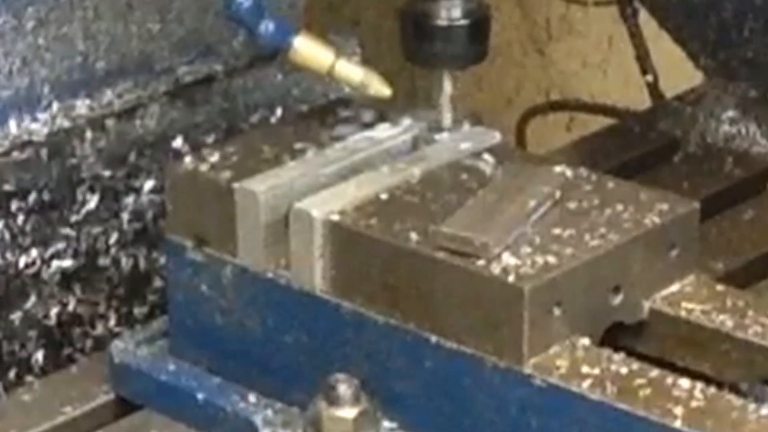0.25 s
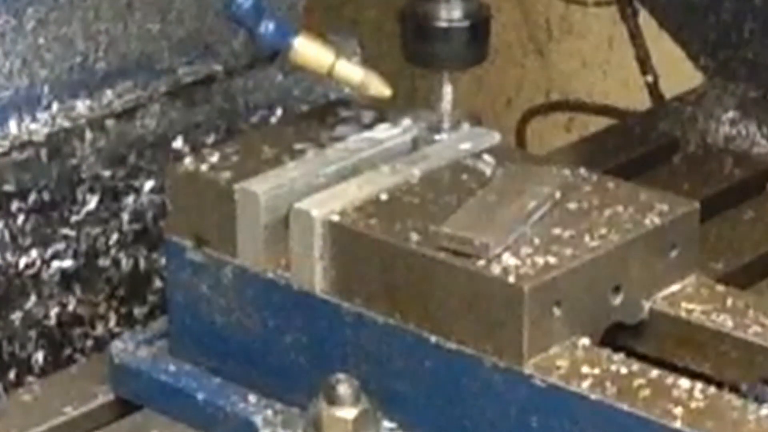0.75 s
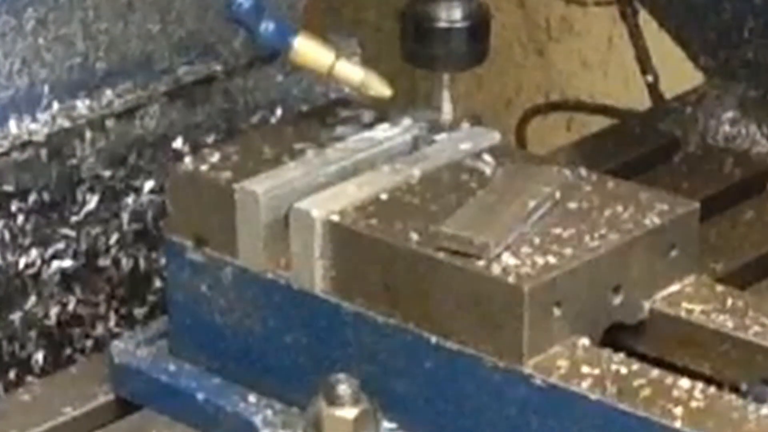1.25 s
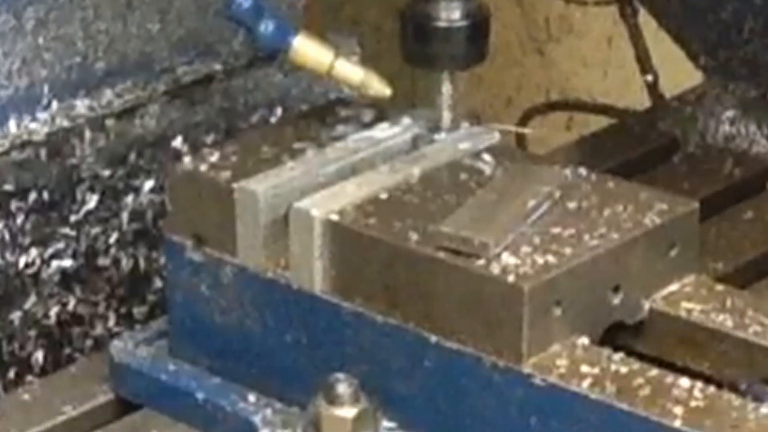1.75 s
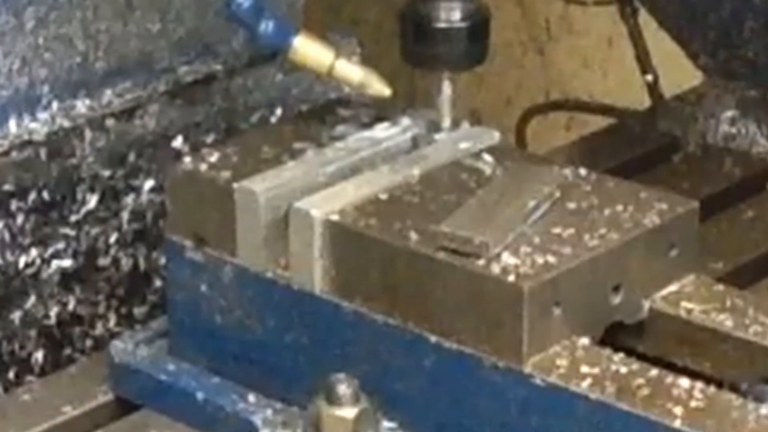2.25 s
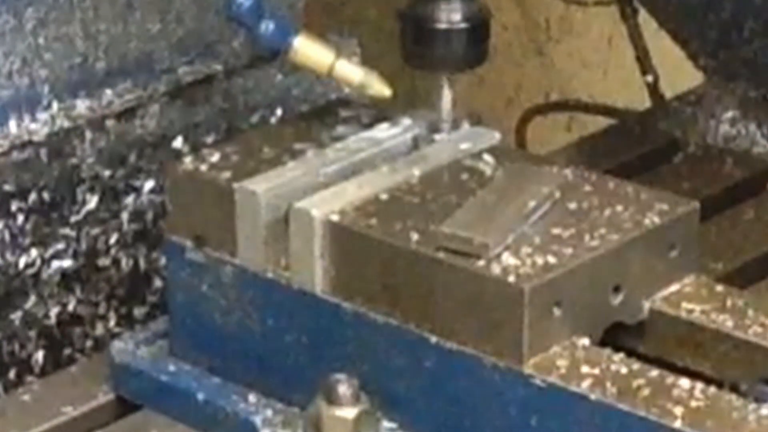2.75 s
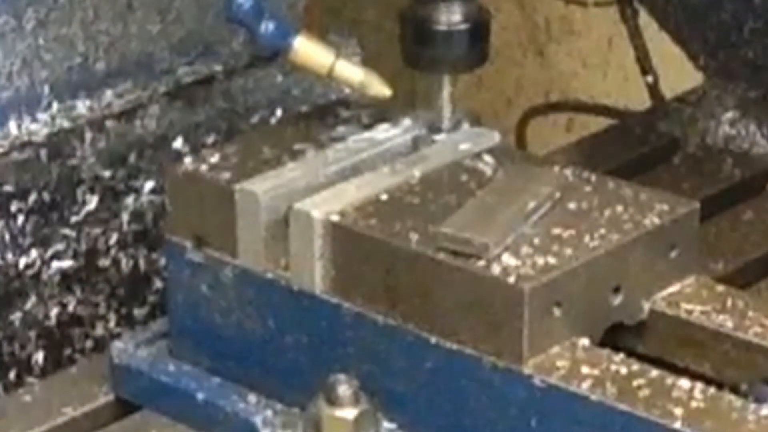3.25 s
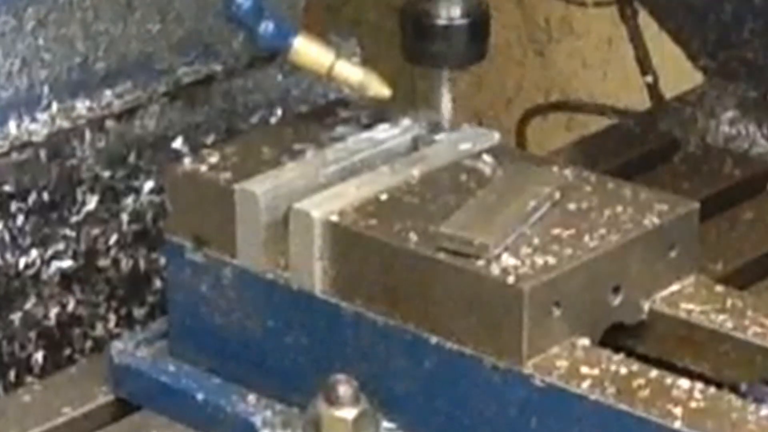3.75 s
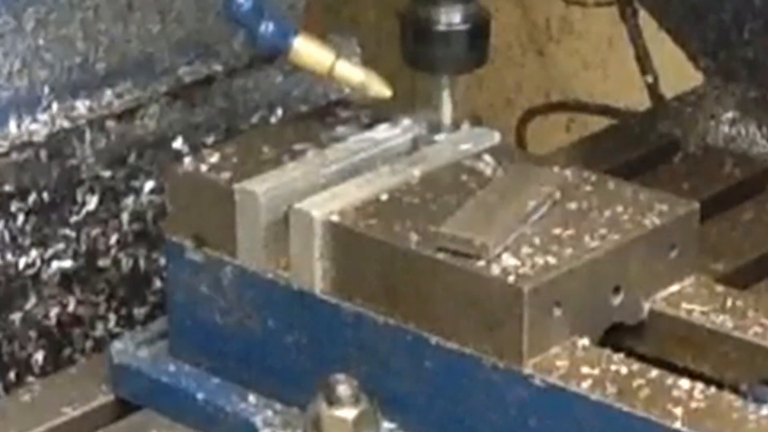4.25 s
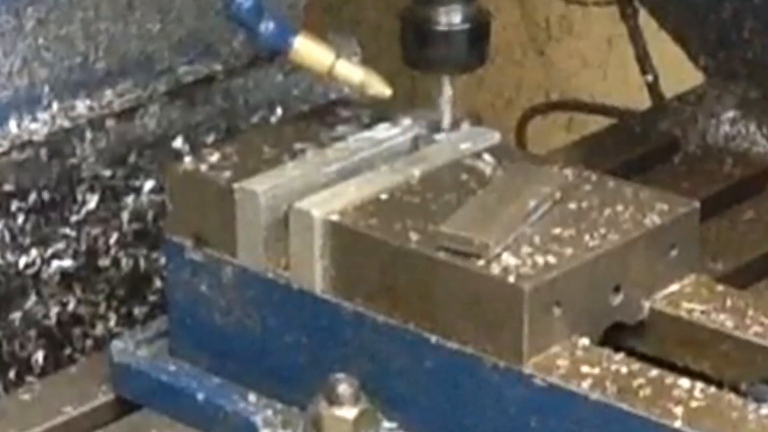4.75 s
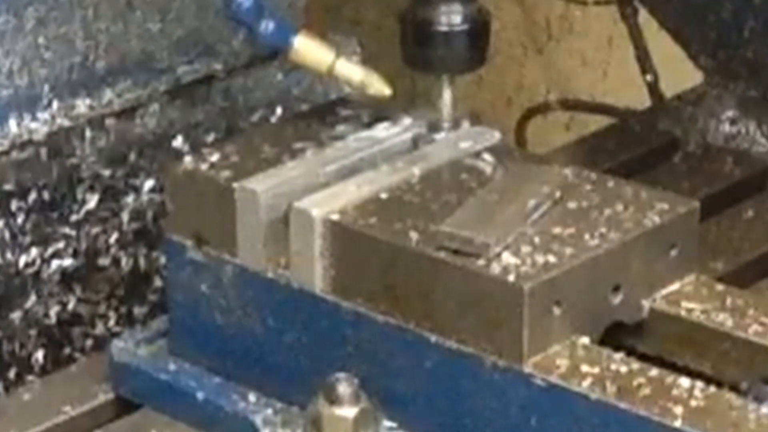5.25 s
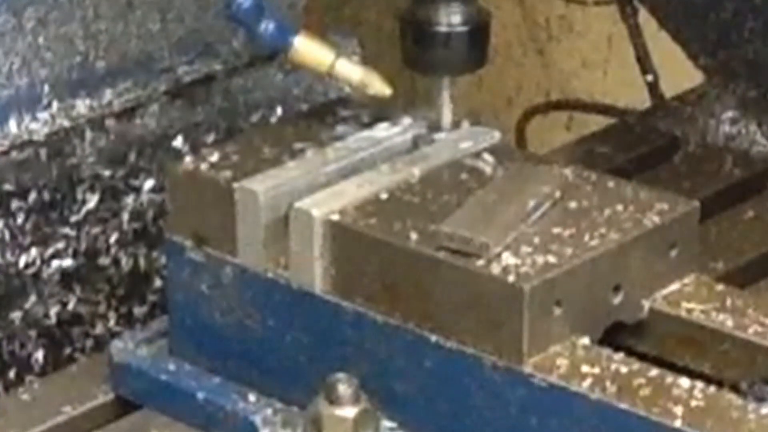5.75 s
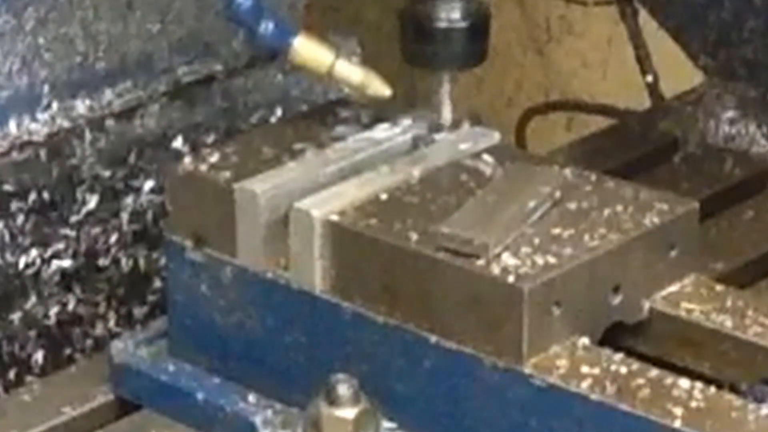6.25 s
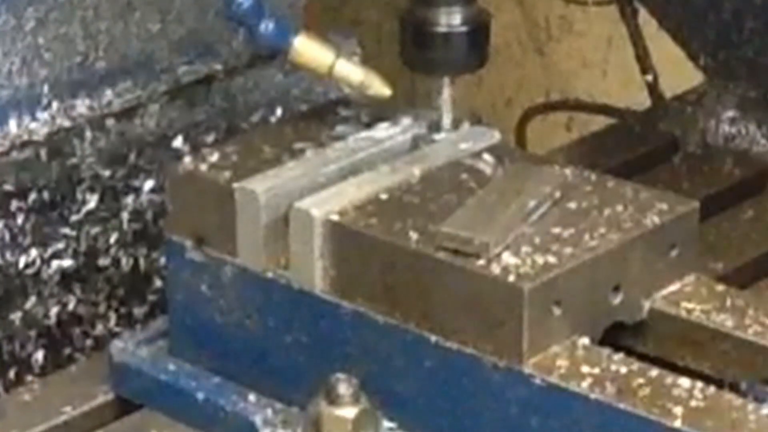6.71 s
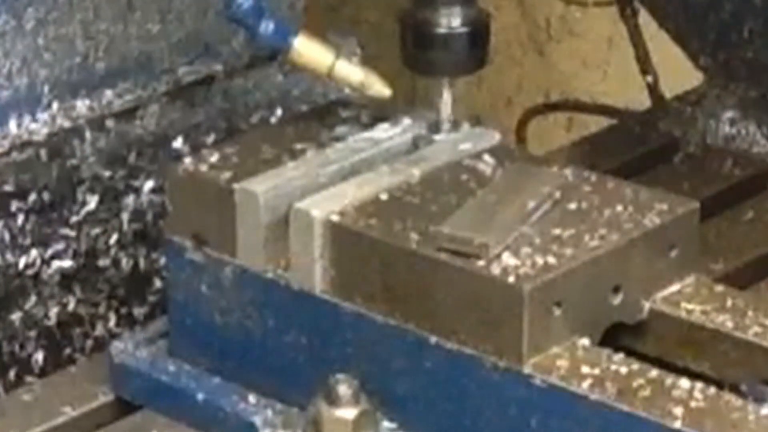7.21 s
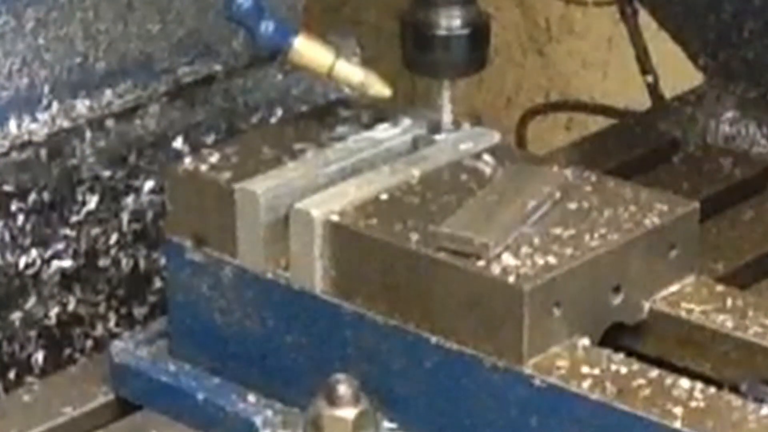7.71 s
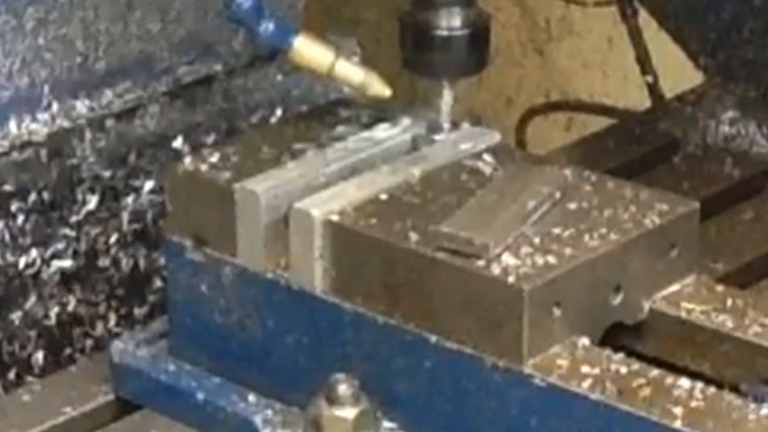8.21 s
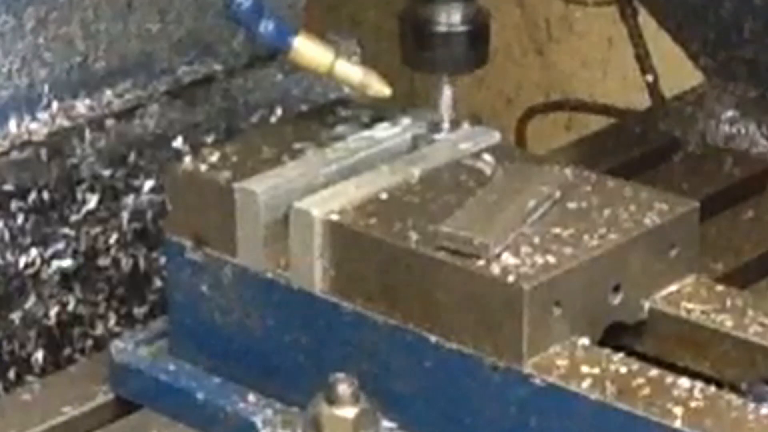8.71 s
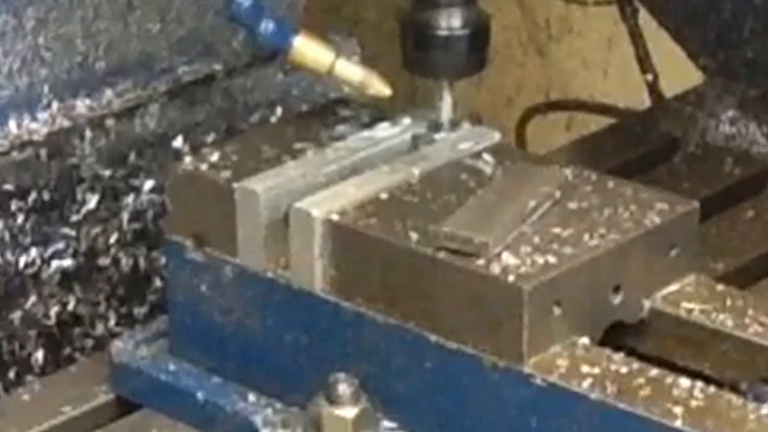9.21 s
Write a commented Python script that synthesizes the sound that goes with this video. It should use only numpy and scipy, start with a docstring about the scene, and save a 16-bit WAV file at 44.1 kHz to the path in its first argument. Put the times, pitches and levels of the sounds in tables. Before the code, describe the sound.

A bright mist-nozzle air jet hisses steadily with a breathy, surging whistle, while a milling cutter rumbles faintly in repeated passes with small knocks.

```python
"""A mist nozzle's air jet hisses: noise with peaks in its spectrum, with flutter and short metallic echoes.
The jet whistles on the edge of a part being milled: narrow noise bands that surge about twice a second
and drop in pitch between passes. The cut adds a rumble and a ringing vice: noise that grows in each pass.
The spindle drive sings in close sine lines at its switching rate and twice that; chips and cutter knock
in short filtered noise bursts."""
import sys
import numpy as np
from scipy import signal
from scipy.fft import rfft, irfft, next_fast_len
from scipy.io import wavfile

SR = 44100
rng = np.random.default_rng(int(sys.argv[2]) if len(sys.argv) > 2 else 0)


def generate_wav(signal):
    """Clip the signal to [-1, 1] and save it as 16-bit WAV at the path in sys.argv[1]."""
    frames = np.transpose(np.atleast_2d(signal))
    scaled = np.clip(frames, -1, 1) * 32767
    pcm = np.round(scaled).astype(np.int16)
    wavfile.write(sys.argv[1], SR, pcm)


N = 417627
T, HZ = np.arange(N) / SR, np.fft.rfftfreq(N, 1 / SR)

# passes of the cutter along the part: (start t/s, time for the jet to come onto the edge/s, end t/s,
# time to leave it/s, deeper pitch sag of the first surges/Hz, load level/dB)
CUTTER_PASSES = [(-.2, .15, 1.86, .14, 340, -2), (2.39, .08, 3.84, .2, 80, 0),
                 (4.37, .19, 5.99, .11, 60, 0), (6.57, .11, 8.37, .12, 60, 1.5),
                 (8.86, .34, 10.5, .15, 60, 0)]


def amp(db):
    """Decibels to gain."""
    return 10 ** (np.asarray(db) / 20)


def unit(x):
    """Scales to an rms of one."""
    return x / np.sqrt(np.mean(x ** 2) + 1e-20)


def slope(points):
    """A spectrum in dB: straight lines on a log-frequency axis."""
    hz, db = np.transpose(points)
    return np.interp(np.log(HZ + 1), np.log(hz), db)


def bumps(peaks):
    """The lift in dB that spectral peaks give to each frequency."""
    return sum(db / (1 + (2 * (HZ - hz) / width) ** 2) for hz, width, db in peaks)


def colour(x, db):
    """Filters a sound by a spectrum in dB."""
    size = next_fast_len(N)
    gain = amp(np.interp(np.fft.rfftfreq(size, 1 / SR), HZ, db))
    return irfft(rfft(x, size) * gain, size)[:N]


def wander(rate_hz):
    """Random movement of rms one, rolled off above the given rate."""
    lowpass = -10 * np.log10(1 + (HZ / rate_hz) ** 4)
    return unit(colour(rng.standard_normal(N), lowpass))


def fuzzy_tone(hz, width_hz):
    """Turbulence gathered in a narrow band around a pitch that may move; rms one."""
    band = -10 * np.log10(1 + (2 * HZ / width_hz) ** 6)
    turn = 2 * np.pi * np.cumsum(hz * np.ones(N)) / SR
    # two independent slow noises on cosine and sine move the band up to the pitch
    in_phase = colour(rng.standard_normal(N), band) * np.cos(turn)
    quadrature = colour(rng.standard_normal(N), band) * np.sin(turn)
    return unit(in_phase + quadrature)


def ramp(start, length):
    """Rises from zero to one over the given time."""
    return np.clip((T - start) / length, 0, 1)


def jet(flutter_db=0.66, flutter_hz=60, sputter_db=0.76, sputter_hz=50, guard=0, hiss_db=-39):
    """Turbulent air hisses as peaked noise; coolant in the air stream makes it flutter."""
    # spectrum of air and mist leaving the nozzle: (f/Hz, relative level per Hz/dB)
    air_spectrum = [(100, -60), (400, -23), (1100, -15.5), (1550, -15), (1800, -12), (2150, -12.5),
                    (4400, -11), (5400, -9.5), (6300, -5), (7350, -10), (8300, -4), (9100, -2.5),
                    (9900, -13), (10500, -10.5), (11000, -5), (11800, -8.5), (12600, -2), (14200, -5.5),
                    (15300, -9.5)]
    # peaks in the hiss's spectrum: (f/Hz, width/Hz, lift/dB)
    hiss_peaks = [(4860, 78, 3.5), (6764, 92, 5.5), (8520, 190, 1), (8710, 385, 7.5), (11950, 150, 9.5),
                  (12640, 70, 4.5), (12820, 33, 4), (14600, 220, 7.5)]
    hiss = unit(colour(rng.standard_normal(N), slope(air_spectrum) + bumps(hiss_peaks) + guard))
    # droplets disturb the band around 8700 Hz more than the rest of the jet
    sputter_band = colour(hiss, -10 * np.log10(1 + ((HZ - 8700) / 650) ** 4))
    sputter = amp(sputter_db * wander(sputter_hz)) - 1
    hiss = hiss + sputter_band * sputter
    return amp(hiss_db + flutter_db * wander(flutter_hz)) * hiss


def walls(x, echo_db=-8.5, count=40):
    """Near metal surfaces return many short echoes, which comb the treble."""
    delay_s = rng.uniform(.001, .022, count)
    sign = rng.choice([-1, 1], count)
    taps = np.zeros(SR // 40)
    taps[(delay_s * SR).astype(int)] = sign / np.sqrt(delay_s)
    echoes = signal.oaconvolve(x, taps / np.linalg.norm(taps))[:N]
    treble = -10 * np.log10(1 + (4500 / (HZ + 1)) ** 4)
    return x + amp(echo_db) * colour(echoes, treble)


def surge(points, cycle_s=.5285):
    """Pitch and level of the whistle as one surge repeats in a steady cycle."""
    s, pitch, db = np.transpose(points)
    return np.array([np.interp(T, s, v, period=cycle_s) for v in (pitch, db)])


def whistle_course(unsteady_hz=35, unsteady_db=0.72, unsteady_rate_hz=12, settle_s=.65, graze_db=2.5):
    """Pitch, level and grazing of the corner: each pass puts the jet on the edge and lifts the whistle."""
    # one surge with the jet full on the edge, swelling strongly then weakly, before variation and trim:
    # (t into the cycle/s, f/Hz, level/dB)
    on_edge_surge = [(.045, 3114, -55), (.12, 2972, -49.5), (.185, 2852, -47.5), (.265, 2860, -52),
                     (.325, 3099, -58.5), (.39, 2926, -52), (.5, 2947, -52.5)]
    # the same surge with the jet beside the edge, lower and weaker: (t into the cycle/s, f/Hz, level/dB)
    off_edge_surge = [(.01, 2447, -51.5), (.11, 2483, -53.5), (.185, 2090, -60), (.275, 2397, -55.5),
                      (.34, 2270, -63.5), (.44, 2329, -53.5)]
    on_edge, deeper_hz = np.zeros(N), np.zeros(N)
    for start, rise, end, fall, sag_hz, _ in CUTTER_PASSES:
        here = ramp(start, rise) * (1 - ramp(end - fall, fall))
        on_edge += here
        # the extra sag settles after each entry
        deeper_hz += here * sag_hz * np.exp(-abs(T - start) / settle_s)
    on_pitch, on_db = surge(on_edge_surge)
    off_pitch, off_db = surge(off_edge_surge)
    pitch = on_edge * on_pitch + (1 - on_edge) * off_pitch
    db = 20 * np.log10(on_edge * amp(on_db) + (1 - on_edge) * amp(off_db))
    sagging = (on_pitch.max() - on_pitch) / np.ptp(on_pitch)
    # grazing peaks when the jet is halfway onto the edge, and makes the whistle louder
    graze = np.sin(np.pi * on_edge)
    # no two surges are quite alike
    pitch = pitch - deeper_hz * sagging + unsteady_hz * wander(unsteady_rate_hz)
    db = db + graze_db * graze + unsteady_db * wander(unsteady_rate_hz)
    return pitch, db, graze


def edge_tone(guard, level_db=-2.5, locked_hz=2900, loose_hz=2200, loud_spread=0.031,
              flicker_db=0.25, flicker_hz=22, low_hz=1945, low_db=-58):
    """The jet whistles on the edge: purest high and soft, breathy when loud, loose when low or grazing."""
    narrow_hz, broad_hz = 75, 480
    stray_hz, stray_rate_hz, least_stray = 240, 16, .16
    pitch, db, graze = whistle_course()
    loose = np.clip((locked_hz - pitch) / (locked_hz - loose_hz) + .5 * graze, least_stray, 1)
    airy = np.clip(loud_spread * (db - db.min()), .1, .4)
    # two eddies stray from the mean pitch, each in its own way, inside a band of rushing air
    strands = unit(sum(fuzzy_tone(pitch + stray_hz * loose * wander(stray_rate_hz), narrow_hz)
                       for _ in range(2)))
    tone = np.sqrt(1 - airy) * strands + np.sqrt(airy) * fuzzy_tone(pitch, broad_hz)
    level = amp(db + level_db + flicker_db * wander(flicker_hz))
    whistle = colour(level * tone, guard)
    # at the bottom of its range the whistle catches on a low standing wave
    caught = np.exp(-((pitch - low_hz) / 420) ** 2)
    return whistle + amp(low_db) * caught * fuzzy_tone(low_hz, 76)


def load_level(idle_db, entry_db, growth_db_per_s, bite_lead_s=.16, release_lag_s=0.033, bite_ramp_s=0.08):
    """A level that steps up when the flutes bite, grows through the pass and drops when they let go."""
    db = np.full(N, float(idle_db))
    for start, _, end, _, _, load_db in CUTTER_PASSES:
        # the flutes bite a little before a pass starts and let go just after it ends
        bite = ramp(start - bite_lead_s, bite_ramp_s)
        release = ramp(end + release_lag_s - bite_ramp_s, bite_ramp_s)
        loaded_db = entry_db + load_db + growth_db_per_s * (T - start)
        db += bite * (1 - release) * (loaded_db - idle_db)
    return db


def cutting(guard, rough_db=1.56, rough_hz=60, guard_ring=0.7):
    """The flutes tear at the metal with a broad rumble; table and vice ring as the cut grows heavy."""
    # spectrum of the rumble: (f/Hz, relative level per Hz/dB)
    rumble_spectrum = [(25, -40), (55, -35), (90, -19.5), (125, -10), (160, 1), (200, 1.5), (300, 3),
                       (420, 1), (650, 1.5), (1000, -10.5), (2000, -14.5), (5000, -36)]
    # modes of table and vice: (f/Hz, width/Hz, relative level/dB)
    vice_modes = [(160, 10.7, -16), (184, 19, -7), (223.4, 19, 2), (238, 46, -9), (290.5, 20, -11.5),
                  (340.3, 8.8, -7.5), (374.2, 22.6, 1), (563, 26, -8), (684, 20, -8)]
    force = rng.standard_normal(N) * amp(rough_db * wander(rough_hz))
    rumble = unit(colour(force, slope(rumble_spectrum) + guard_ring * guard))
    body = unit(sum(amp(db) * fuzzy_tone(hz, width) for hz, width, db in vice_modes))
    tear_db = load_level(idle_db=-64.5, entry_db=-62.5, growth_db_per_s=1.4)
    ring_db = load_level(idle_db=-71.5, entry_db=-66.5, growth_db_per_s=2.5)
    return amp(tear_db) * rumble + amp(ring_db) * body


def spindle(waver_db=2.5, drift_hz=0.54, carrier_hz=3999, step_hz=11.85):
    """The drive's switching makes the motor sing in close lines that beat into an uneven trill."""
    # sidebands of the drive: (multiple of the switching rate, steps away from it)
    sideband_places = [(1, -9), (1, -5), (1, -3), (1, -1), (1, 1), (1, 3), (1, 5), (1, 9), (2, -2), (2, 0)]
    # their levels before wavering, in the same order: (level/dB)
    sideband_levels = [-74, -70, -65, -65.5, -70.5, -68.5, -74, -79, -65, -62]
    # motor hum before wavering: (f/Hz, level/dB)
    hum_lines = [(777, -83)]
    drift = drift_hz * np.cumsum(wander(1.85)) / SR  # turns
    waver = amp(waver_db * wander(5.3))
    # the motor's frame delays the outer sidebands, which smears the beats
    smear = .027  # turns per step squared
    lines = [(k * carrier_hz + step * step_hz, db, smear * step ** 2)
             for (k, step), db in zip(sideband_places, sideband_levels)]
    lines += [(hz, db, 0) for hz, db in hum_lines]
    song = np.zeros(N)
    for hz, db, lag in lines:
        # each line wavers in its own time
        own_waver = np.roll(waver, rng.integers(N))
        song += amp(db) * own_waver * np.sin(2 * np.pi * (hz * T + drift + lag))
    return np.sqrt(2) * song


def knocks(rise_s=0.00042, low_cut_hz=220):
    """Chips and cutter knock: each a short noise burst that rings around one pitch and dies."""
    # chips striking the guard and knocks of the cutter:
    # (t/s, level at the strike/dB, f/Hz, width/Hz, 60 dB decay time/s)
    strikes = [(0.271, -58, 980, 90, 0.94), (0.8828, -49, 1135, 217.4, .13), (1.8319, -49, 516, 348, 0.09),
               (2.1942, -54, 631, 160, 0.085), (2.3137, -52, 557, 396, 0.14), (3.247, -62, 791, 155, .1),
               (3.73, -53, 378, 348.6, 0.22), (5.925, -49.5, 470, 403, .17),
               (7.9865, -51, 1153, 150.6, 0.11), (8.1275, -55, 383, 199, 0.077),
               (8.3336, -52, 480, 451, 0.11)]
    out = np.zeros(N)
    age = np.arange(SR // 2) / SR
    for s, db, hz, width, t60 in strikes:
        b, a = signal.iirpeak(hz, hz / width, SR)
        ring = unit(signal.lfilter(b, a, rng.standard_normal(len(age))))
        envelope = amp(db - 60 * age / t60) * (1 - np.exp(-age / rise_s))
        out[round(s * SR):][:len(age)] += envelope * ring
    return colour(out, -10 * np.log10(1 + (low_cut_hz / (HZ + 1)) ** 8))


def scene(jet_ring=0.72, beam_hz=2200):
    """The guard colours jet, whistle and cut; the jet beams its treble straight at the one microphone."""
    # standing waves inside the machine's guard: (f/Hz, width/Hz, lift/dB)
    guard_modes = [(786.7, 22, 14), (986, 20, 12), (1056, 12, 2), (1385, 29, 12), (1740, 46, 5),
                   (1910, 51, 11), (2266, 37, 9.5), (2380, 29, 9), (2496, 31, 9.5), (2650, 27, 7),
                   (2717, 26.5, 12.5), (2750, 8.6, 2), (2933, 86, 8), (2970, 36, -1), (3093, 32, 9.5),
                   (3195, 56, 9.5)]
    guard = bumps(guard_modes)
    # the beamed treble takes less colour from the guard
    jet_guard = jet_ring * guard / (1 + (HZ / beam_hz) ** 4)
    hiss = walls(jet(guard=jet_guard))
    mono = hiss + edge_tone(guard) + cutting(guard) + spindle() + knocks()
    return np.array([mono, mono])


def record(dry):
    """The recorder's band limit: a steep low-pass."""
    lowpass = signal.firwin(1023, 15290, window=("kaiser", 8), fs=SR)  # cutoff in Hz
    return signal.oaconvolve(dry, lowpass[None], "same")


dry = scene()
out = record(dry)
generate_wav(out)
```